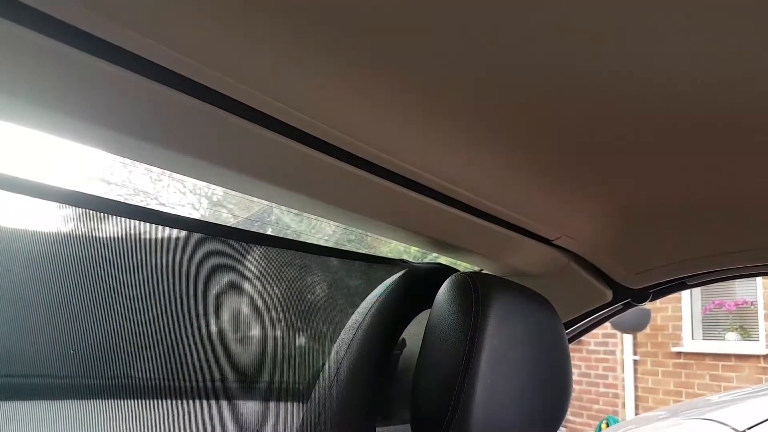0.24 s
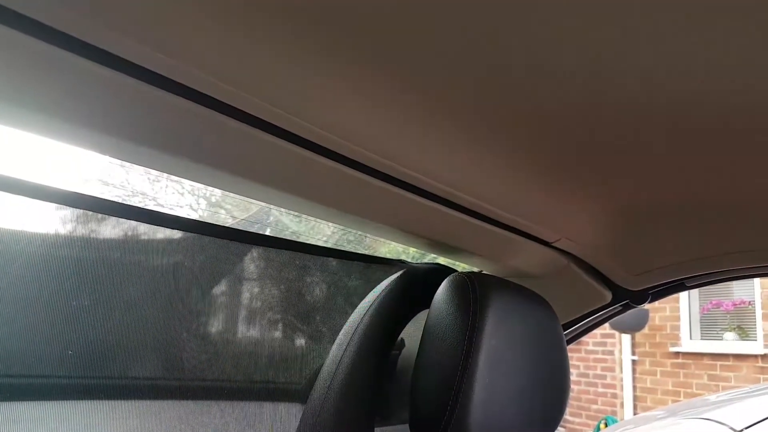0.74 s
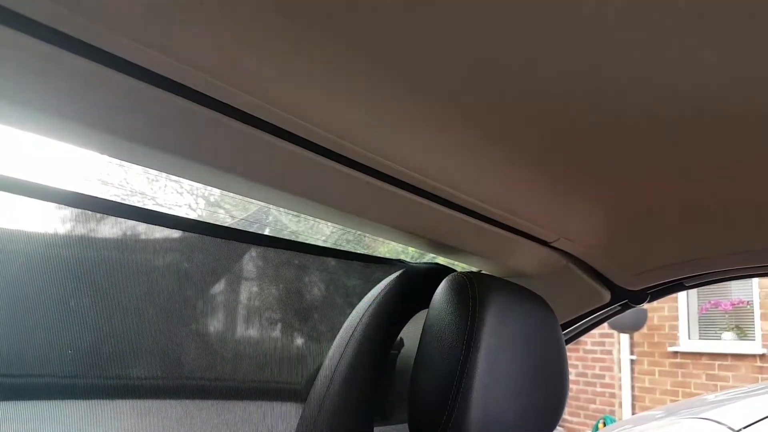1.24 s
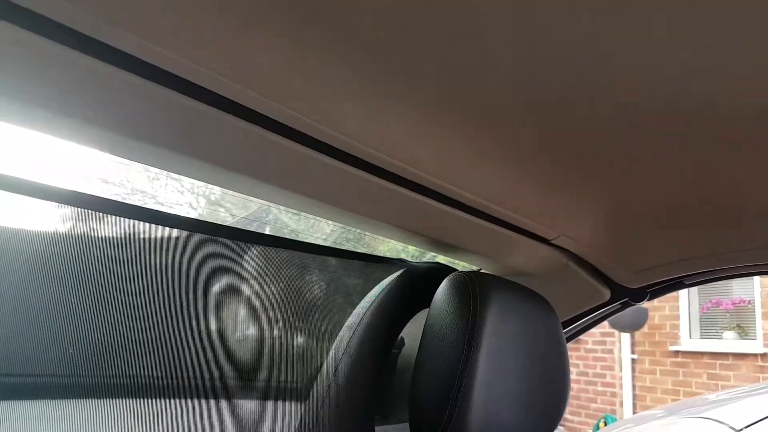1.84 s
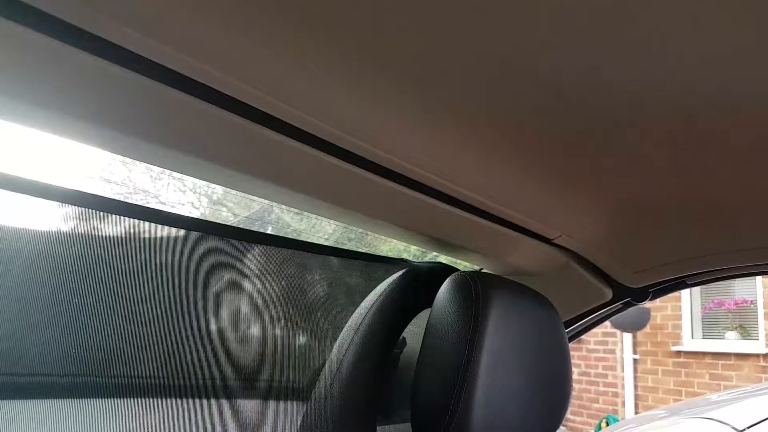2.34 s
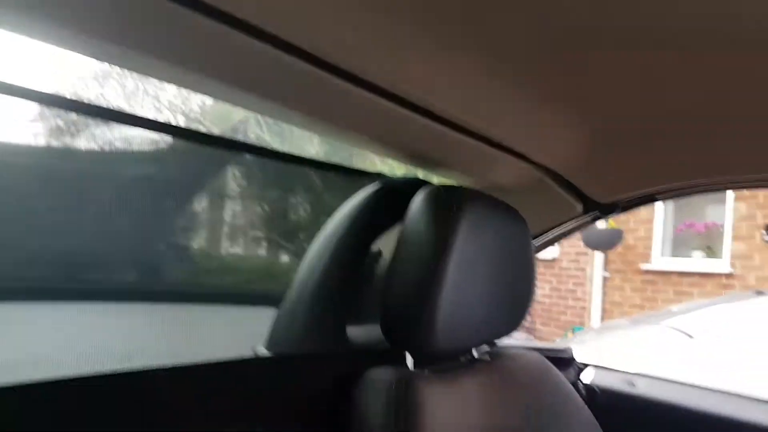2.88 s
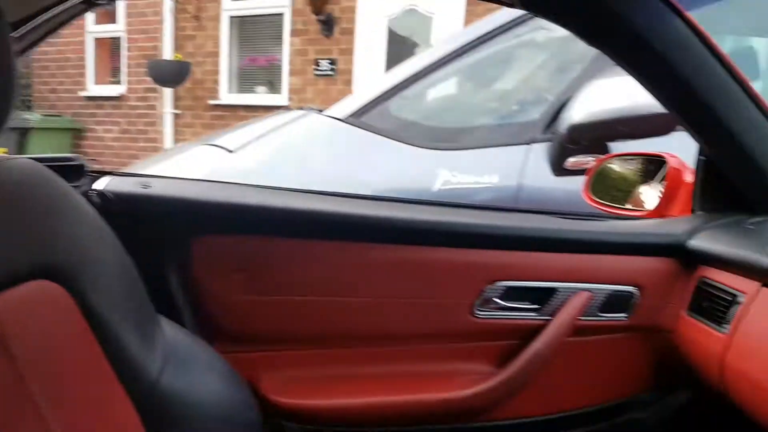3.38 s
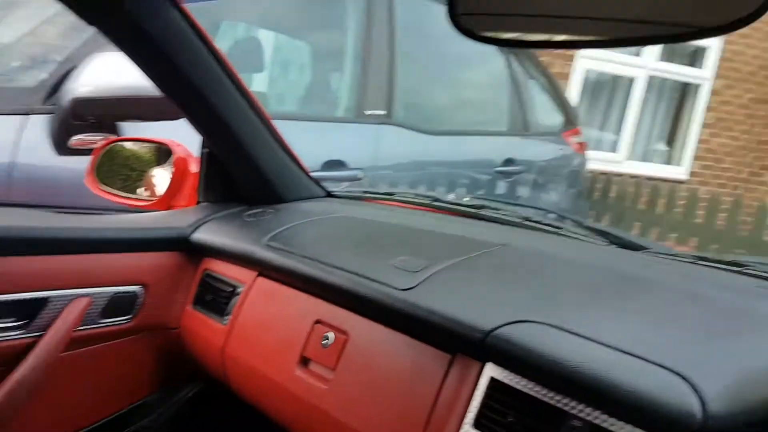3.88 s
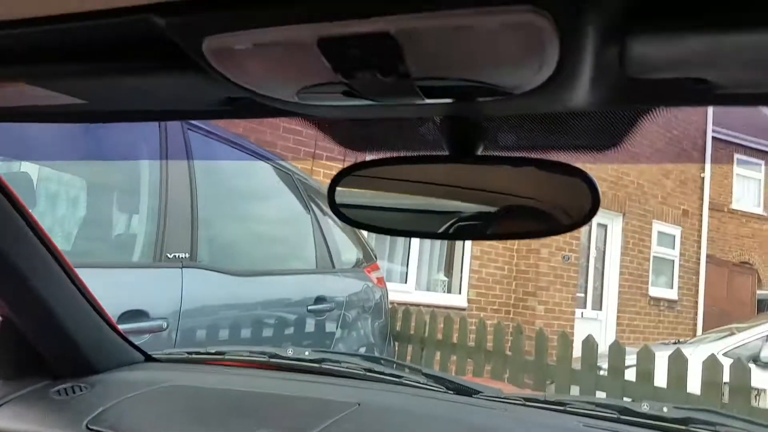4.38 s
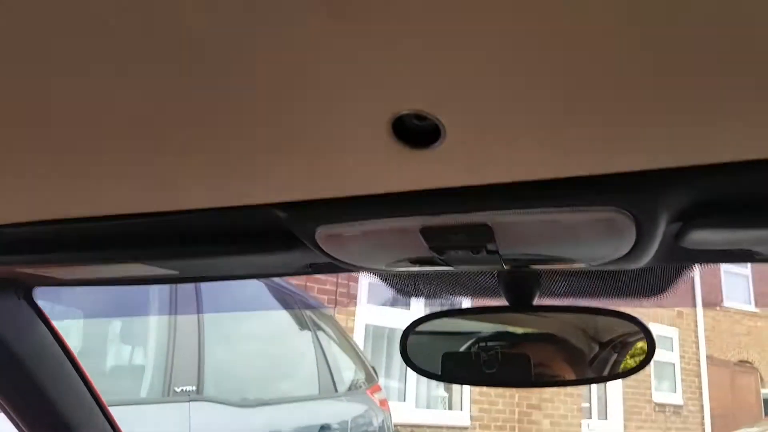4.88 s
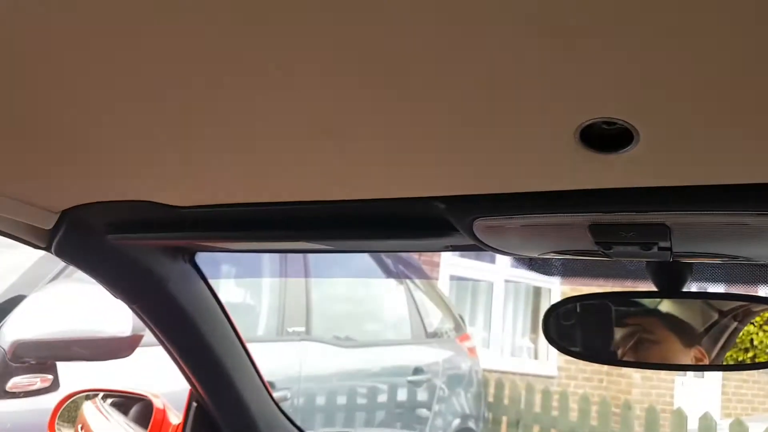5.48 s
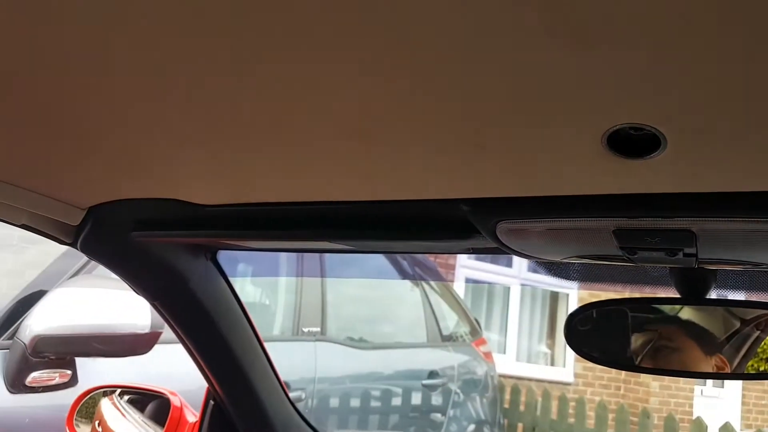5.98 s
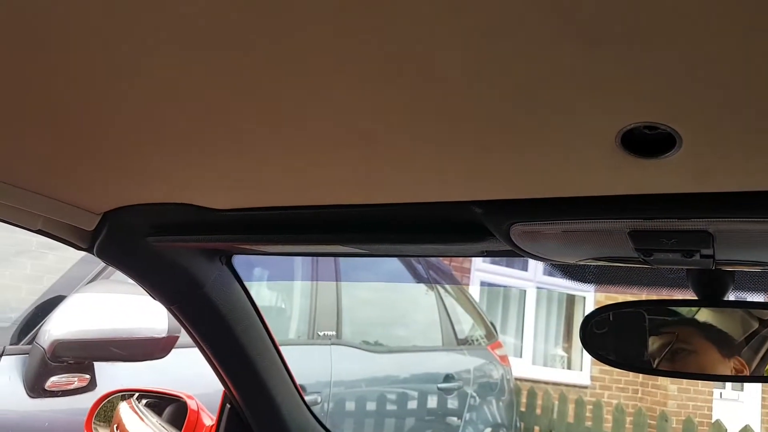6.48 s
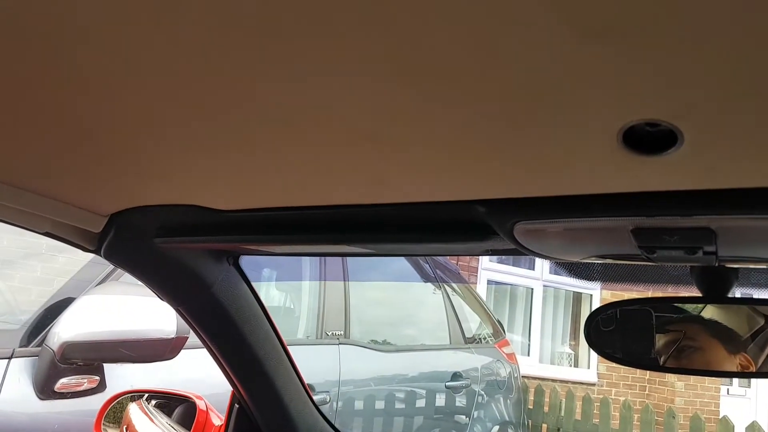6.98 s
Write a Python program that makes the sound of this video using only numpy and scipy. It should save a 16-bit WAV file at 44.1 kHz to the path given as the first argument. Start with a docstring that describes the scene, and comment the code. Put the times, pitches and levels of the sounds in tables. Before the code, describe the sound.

Close, enclosed car cabin with a handheld stereo microphone. Engine idle and low electric hum run throughout. Three short bursts of whining, scraping roof motor pull the hum down in pitch and level; each ends with a click, a boomy clunk with rattling rebound and a brief falling groan. Soft sleeve rustling comes in the middle, then a calmer stretch before the last burst.

```python
"""Inside an idling convertible whose folding roof is stuck; an electric pump hums steadily.
Engine and pump are wavering multiples of a rotation rate; the engine adds coloured noise.
Shortly after each press of the roof switch a drive motor whines and scrapes, and the hum sags under the load.
When the switch is let go the mechanism stops with a double knock, built of ringing modes and rattling noise,
and the hum recovers. Cloth rustles as the microphone swings round to the front of the cabin."""
import sys
import numpy as np
from scipy import signal
from scipy.fft import rfft, irfft, next_fast_len
from scipy.io import wavfile

SR = 44100
rng = np.random.default_rng(int(sys.argv[2]) if len(sys.argv) > 2 else 0)


def bounce(signal):
    """Save signal as a 16-bit WAV file at the path given by the first command-line argument."""
    frames = np.transpose(np.atleast_2d(signal))
    limited = np.clip(frames, -1, 1)
    pcm = np.round(limited * 32767).astype(np.int16)
    wavfile.write(sys.argv[1], SR, pcm)


N = 318843
TIME = np.arange(N) / SR

# likeness of the two microphone ports: (frequency [Hz], left-right correlation [-1 to 1])
PORT_LIKENESS = [(50, .985), (138, .95), (250, .84), (500, .5), (1000, -.2), (2000, 0), (4000, .1),
                 (12000, 0)]
# low engine noise: (frequency [Hz], relative density [dB per Hz])
RUMBLE_COLOUR = [(150, 1.5), (200, -3), (250, -3.5), (300, -4), (390, -5), (470, -10), (560, -7),
                 (660, -11)]
# engine drone through the bulkhead: (frequency [Hz], relative density [dB per Hz])
DRONE_COLOUR = [(560, -6.5), (680, -3.5), (880, -0.5), (1000, -3), (1170, -5), (1400, -7), (1900, -11),
                (2600, -15.5), (3500, -23.5)]
# runs of the drive motor, the first already under way: (start [s], stop [s], whine level [dB])
MOTOR_RUNS = [(-.29, 0.48, -59.5), (1.757, 2.72, -60), (6.469, 7.041, -61)]
# knocks in the body:
# (time [s], boom [dB], panel [dB], rattle [dB], motor mount [dB], end stop clack [dB])
BODY_KNOCKS = [(.115, -46, -53, -46, -28.5, -60), (0.4808, -20, -25, -26.5, -38, -19.5),
               (1.748, -31, -44.5, -49, -28.5, -42), (1.82, -25.5, -34.5, -34, -23.5, -35),
               (2.205, -37, -60, -50, -34, -60), (2.7211, -20.5, -22.5, -24.5, -32, -17),
               (6.467, -29, -42.5, -37.5, -28, -46), (6.493, -46, -50, -40, -39, -38),
               (6.545, -25.5, -34, -36, -22.5, -34), (7.0435, -20.5, -40, -27, -28, -35)]
# modes of the rubber roof seal: (frequency [Hz], level [dB], t60 [s])
SEAL_MODES = [(1900, -3, .007), (2280, 0, .0075), (2560, -8, .007)]

# the microphone swings past the dashboard: time and spread
SWING_AT_S, SWING_WIDTH_S = 3.87, 0.56
# after every stop the linkage falls back in a second knock, met once the slack is taken up
REBOUND_S, SLACK_S = 0.045, 0.001952


def from_db(db):
    """Decibels to gain."""
    return 10 ** (np.asarray(db) / 20)


def rms_one(x):
    """Scale to rms 1."""
    return x / np.sqrt(np.mean(x ** 2) + 1e-20)


def in_time(rows):
    """Each column of a curve, sample by sample."""
    s, *columns = np.transpose(rows)
    return [np.interp(TIME, s, c) for c in columns]


def at_hz(points, hz):
    """Read a table on a log-frequency axis."""
    table_hz, values = np.array(points)[:, 0], np.array(points)[:, 1]
    return np.interp(np.log(hz + 1e-3), np.log(table_hz), values)


def ramp(start, length):
    """Rises from 0 to 1 in a straight line."""
    return np.clip((TIME - start) / length, 0, 1)


def hump(centre, width):
    """A smooth swell of height 1."""
    return np.exp(-np.minimum(((TIME - centre) / width) ** 2, 50))


def drift(rate_hz):
    """Slow chance of spread 1: low-passed noise, drawn every 40 samples and joined by straight lines."""
    pole = np.exp(-80 * np.pi * rate_hz / SR)
    draws = rng.standard_normal(N // 40 + 2002)
    slow = signal.lfilter([1], [1, -2 * pole, pole * pole], draws)[2000:]  # settled part only
    return np.interp(np.arange(N) / 40, np.arange(len(slow)), rms_one(slow))


def ports(hz):
    """Gains of the two ports at this frequency."""
    # (frequency [Hz], left minus right [dB])
    balance = [(50, -1.3), (130, 0.5), (250, 0.5), (600, -3), (2000, -2), (4000, -3), (12000, -0.5)]
    return from_db(np.array([[.5], [-.5]]) * at_hz(balance, hz))


def port_phase(hz):
    """Phase at each port: short waves reach them out of step."""
    alike = np.clip(at_hz(PORT_LIKENESS, hz), -1, 1)
    return np.array([[.5], [-.5]]) * np.arccos(alike)


def noise(spectrum):
    """Stereo noise of a given colour, falling steeply past its ends; rms 1."""
    size = next_fast_len(N)
    hz = np.arange(size // 2 + 1) * SR / size + 0.00085
    mid, side = rfft(rng.standard_normal((2, size)))
    alike = np.clip(at_hz(PORT_LIKENESS, hz), -1, 1)
    pair = np.sqrt(1 + alike) * mid + np.sqrt(1 - alike) * side * [[1], [-1]]
    ends = np.minimum(1, np.minimum(hz / spectrum[0][0], spectrum[-1][0] / hz)) ** 4
    coloured = pair * ports(hz) * ends * from_db(at_hz(spectrum, hz))
    return rms_one(irfft(coloured, size)[:, :N])


def cycles(hz):
    """Running phase, in radians, of something that turns at this rate."""
    return 2 * np.pi * np.cumsum(hz) / SR


def partials(hz, orders, waver_db, waver_hz, resonances=()):
    """Multiples of a rotation rate, each wavering a little and swelling as it passes a resonance."""
    phase, out = cycles(hz), 0
    for k, db in orders:
        centre_hz = k * np.median(hz)
        level_db = db + waver_db * drift(waver_hz)
        for peak_hz, width_hz, boost_db in resonances:
            level_db = level_db + boost_db / (1 + (2 * (k * hz - peak_hz) / width_hz) ** 2)
        wave = np.sin(round(k) * phase + rng.uniform(0, 2 * np.pi) + port_phase(centre_hz))
        out = out + np.sqrt(2) * from_db(level_db) * ports(centre_hz) * wave
    return out


def burst(s, rise, t60):
    """Envelope of a blow: it swells for the rise time, then dies away."""
    out, start = np.zeros(N), round(s * SR)
    age = TIME[:min(N - start, SR // 2)]
    decay = from_db(-60 * np.maximum(age - rise, 0) / t60)
    out[start:start + len(age)] = np.minimum(age / rise, 1) * decay
    return out


def struck(times, levels_db, hz, t60, scatter_db):
    """One mode, set ringing by each blow with a slightly different strength."""
    out, age = np.zeros((2, N)), TIME[:SR // 2]
    onset = np.minimum(2 * age * hz, 1)  # half a period
    decay = from_db(-60 * age / t60)
    ring = np.sin(2 * np.pi * hz * age + port_phase(hz)) * decay * onset * ports(hz)
    strengths_db = levels_db + scatter_db * rng.standard_normal(len(times))
    for s, db in zip(times, strengths_db):
        start = round(s * SR)
        out[:, start:start + len(age)] += from_db(db) * ring[:, :N - start]
    return out


def chatter(slips, modes):
    """Sharp slips set a few short-lived modes ringing."""
    ring = 0
    for k, (hz, db, t60) in enumerate(modes):
        ring = ring + (-1) ** k * struck([0], db, hz, t60, scatter_db=0)
    return signal.oaconvolve(slips[None], ring[:, :SR // 20], axes=1)[:, :N]


def engine(firing_hz, throb=.1):
    """The idle booms in the cabin; its mechanical noise throbs with the firings."""
    # (multiple of the firing rate, level [dB rms])
    engine_orders = [(1, -43.5), (2, -30.5), (3, -52.5), (4, -51.5), (9, -61), (15, -59)]
    # noise colours: (frequency [Hz], relative density [dB per Hz])
    bass_colour = [(20, -35), (35, 5), (60, -4), (90, 7.5), (125, 3.5), (170, -11.5), (260, -14)]
    hiss_colour = [(2000, 6), (3300, -4.5), (3950, -2.5), (4600, -2.5), (7000, -7), (9300, -12.5),
                   (13000, -8), (15500, -10.5)]
    phase = cycles(firing_hz)
    pulse = 1 + throb * (np.cos(phase) + 0.21 * np.cos(2 * phase))
    boom = partials(firing_hz, engine_orders, waver_db=1.22, waver_hz=35)
    bass = from_db(-45.5) * noise(bass_colour)
    clatter = pulse * (from_db(-47) * noise(RUMBLE_COLOUR) + from_db(-51) * noise(DRONE_COLOUR))
    # the hiss rises and flickers as the microphone swings
    hiss_db = -65 + (4 + 1.5 * drift(40)) * hump(SWING_AT_S, SWING_WIDTH_S)
    return boom + bass + clatter + from_db(hiss_db) * noise(hiss_colour)


def cabin_front(firing_hz, turn_at_s=3.87, turn_s=1.26):
    """Engine noise rings in the front of the cabin and throbs, heard as the microphone turns to it."""
    # (resonance [Hz], width of each of two filter passes [Hz], level [dB rms], depth of throb [0-1])
    front_modes = [(228, 25, -54, 0), (553, 70, -52, 0.46), (888, 90, -67, .7), (1126, 90, -60, .4),
                   (1333, 43, -68.5, 0), (1890, 90, -66.5, 0), (2600, 140, -73, 0.15), (4000, 340, -74, 0)]
    engine_noise = noise(DRONE_COLOUR) + noise(RUMBLE_COLOUR)
    beat, out = np.cos(cycles(firing_hz)), 0
    for hz, width_hz, db, throb in front_modes:
        peak = signal.iirpeak(hz, hz / width_hz, fs=SR)
        ring = signal.lfilter(*peak, signal.lfilter(*peak, engine_noise))
        out = out + from_db(db) * rms_one((1 + throb * beat) * ring)
    return ramp(turn_at_s, turn_s) * out


def sleeve(uneven_db=2):
    """Cloth brushes unevenly as the arm swings the microphone round: swells of coloured noise."""
    # (time [s], spread [s], level [dB])
    rustles = [(3.38, 0.071, -52.5), (3.52, 0.12, -56), (3.88, 0.35, -53.5), (4.131, 0.089, -58)]
    # (frequency [Hz], relative density [dB per Hz])
    brush_colour = [(620, 7.5), (850, 4), (1300, 3), (1700, -18), (3000, -34)]
    strokes = sum(from_db(db) * hump(s, width) for s, width, db in rustles)
    return strokes * from_db(uneven_db * drift(25)) * noise(brush_colour)


def pump():
    """The pump runs slower and weaker while the drive motor draws current, and swells as it is freed."""
    # (multiple of the stroke rate, relative level [dB])
    pump_orders = [(1, 0), (2, -23.5), (3, -25), (4, -24.5), (5, -27)]
    free_hz, loaded_hz, free_db, loaded_db = 137.46, 114.5, -36.5, -44
    # recovery begins after a wait from the motor's stop
    sag_s, wait_s, recover_s = 0.1741, 0.075, 0.0909
    release_db, release_width_s = 9.5, 0.054
    load, release = 0, 0
    for start, stop, _ in MOTOR_RUNS:
        load = load + ramp(start, sag_s) - ramp(stop + wait_s, recover_s)
        release = release + hump(stop + wait_s, release_width_s)
    stroke_hz = free_hz + (loaded_hz - free_hz) * load
    level_db = free_db + (loaded_db - free_db) * load ** 2 + release_db * release
    level_db = level_db - 5 * hump(SWING_AT_S, SWING_WIDTH_S)  # dips as the microphone swings
    unsteady_hz = stroke_hz * (1 + 0.0024 * drift(6.5))
    return from_db(level_db) * partials(unsteady_hz, pump_orders, waver_db=0.76, waver_hz=20)


def switch(crack_t60=0.041, cabin_t60=0.11, cabin_db=-7, bright_hz=6000):
    """The rocker cracks over, with two plastic rings, a spring ping, a cabin tail and a console thud."""
    # (time [s], snap [dB], console thud [dB], gain of the top [dB], main ring [Hz], second ring [Hz])
    switch_clicks = [(0.392, -35, -41.5, 1.5, 3500, 4480), (1.011, -58, -64, -5, 2600, 3480),
                     (1.0755, -36.5, -30.5, -9, 2510, 3480), (2.5444, -55, -64, 6, 3625, 4480),
                     (2.5684, -34, -37.5, 3.5, 3650, 4480), (5.6712, -48, -64, -14, 2750, 3300),
                     (5.7812, -36, -29, -4, 2640, 3250), (6.9122, -32.5, -34, -4, 2880, 4150),
                     (7.115, -50.5, -32.5, 7, 3460, 4480)]
    # (frequency [Hz], level [dB], t60 [s])
    console_modes = [(299, 6, 0.076), (341, -8, 0.12), (493, -1.5, 0.045), (790, -3, 0.047),
                     (1170, -6, 0.05)]
    # (frequency [Hz], relative density [dB per Hz])
    snap_colour = [(700, -29.5), (2000, -7), (2700, 0.5), (3500, -2.5), (4300, -4.5), (5500, -8),
                   (6500, -10), (9500, -14.5), (13000, -11.5), (15500, -36.5)]
    # rings and spring: levels against the snap
    main_ring_db, second_ring_db, ring_t60 = -2.5, -7, .04
    spring_hz, spring_db, spring_t60 = 6780, -12, .035
    times, snap_db, thud_db, *_ = np.transpose(switch_clicks)
    snap = noise(snap_colour)
    top = signal.sosfilt(signal.butter(1, bright_hz, "high", fs=SR, output="sos"), snap)
    out = struck(times, snap_db + spring_db, spring_hz, spring_t60, scatter_db=1)
    for hz, db, t60 in console_modes:
        out = out + struck(times, thud_db + db, hz, t60, scatter_db=.7)
    for s, db, _, bright_db, main_hz, second_hz in switch_clicks:
        shape = burst(s, 0.00087, crack_t60) + from_db(cabin_db) * burst(s, 0.0013, cabin_t60)
        out = out + from_db(db) * shape * (snap + (from_db(bright_db) - 1) * top)
        for hz, ring_db in (main_hz, main_ring_db), (second_hz, second_ring_db):
            out = out + struck([s], db + ring_db, hz, ring_t60, scatter_db=4)
    return out


def knocks(boom_top_hz=280):
    """A jolt rings the body panels and shakes loose linkage; each stop of the motor has a rebound."""
    # modes of the body panels and the motor mount: (frequency [Hz], level [dB], t60 [s])
    body_modes = [(67, -1.5, 0.12), (109.3, -2, 0.27), (151.5, 1, 0.19), (180, -11.5, 0.49),
                  (227.7, 3.5, 0.11), (340.3, -8.5, 0.29), (430.7, 3, 0.089), (509.4, 3, 0.066),
                  (591, -2, 0.098), (732, 1, 0.083), (811, 2.5, 0.088), (903, 1, 0.072), (998, -20, 0.16),
                  (1310, -5, 0.04), (1740, -8, 0.033), (1930, -5, 0.032)]
    mount_modes = [(313, -4.5, 0.11), (363, 1.5, 0.052)]
    # linkage rattle: (frequency [Hz], relative density [dB per Hz])
    rattle_colour = [(150, 11), (450, 12), (850, 8), (1100, 4.5), (1500, 0), (2000, -4.5), (2500, -6.5),
                     (4000, -18.5), (7000, -24.5), (10000, -39), (15500, -35)]
    rattle_rise_s, rattle_t60 = 0.0007, .135
    # rows: time, boom, panel, rattle, rise of the rattle
    blows = [(*knock, rattle_rise_s) for *knock, _, _ in BODY_KNOCKS]
    # the rebound's rattle swells more slowly
    blows += [(stop + REBOUND_S, -30, -38.5, -26.5, 0.008) for _, stop, _ in MOTOR_RUNS]
    times, boom_db, panel_db, rattle_db, rises = np.transpose(blows)
    jolts, *_, mount_db, _ = np.transpose(BODY_KNOCKS)
    body = sum(struck(jolts, mount_db + db, hz, t60, scatter_db=4.5) for hz, db, t60 in mount_modes)
    for k, (hz, db, t60) in enumerate(body_modes):
        blow_db = boom_db if hz < boom_top_hz else panel_db
        body = body + (-1) ** k * struck(times, db + blow_db, hz, t60, scatter_db=.7)
    shake = 0
    for s, db, rise in zip(times, rattle_db, rises):
        shake = shake + from_db(db) * burst(s, rise, rattle_t60)
    flutter = rms_one(from_db(2 * drift(310)))
    return body + shake * flutter * noise(rattle_colour)


def end_stop():
    """Each jolt has a short, hard clack of ringing modes as the end stop is met."""
    # (frequency [Hz], level [dB], t60 [s])
    stop_modes = [(540, -3, .02), (770, 0, .024), (1260, -9, .018), (1770, -13, .03), (1940, -10, .018)]
    times, *_, clack_db = np.transpose(BODY_KNOCKS)
    met = times + SLACK_S
    return sum(struck(met, clack_db + db, hz, t60, scatter_db=.7) for hz, db, t60 in stop_modes)


def rebound_chatter(count=4, gap_s=.0052, peak_db=-32):
    """On each rebound a loose link strikes a few times in quick succession, hardest in the middle."""
    # (frequency [Hz], level [dB], t60 [s])
    link_modes = [(850, 0, .035), (1150, -7, .03), (1640, -2, .04), (1970, -7, .03), (2400, -13, .025)]
    contacts = np.zeros(N)
    strength = from_db(peak_db) * np.sin(np.pi * (np.arange(count) + .5) / count)
    for _, stop, _ in MOTOR_RUNS:
        uneven = np.arange(count) + rng.uniform(-0.265, .25, count)
        times = stop + REBOUND_S + SLACK_S + gap_s * uneven
        contacts[np.round(times * SR).astype(int)] = strength
    return chatter(contacts, link_modes)


def braking(first_hz=240, fall_s=.09, level_db=-23.5, rise_s=0.033, t60=0.53):
    """At each stop the motor brakes with a groan whose pitch falls to 1/e of its start in fall_s."""
    out = 0
    for _, stop, _ in MOTOR_RUNS:
        hz = first_hz * np.exp(-np.maximum(TIME - stop, 0) / fall_s)
        out = out + burst(stop, rise_s, t60) * np.sin(cycles(hz) + rng.uniform(0, 2 * np.pi))
    return from_db(level_db) * out


def joint_ticks(rise_s=.001, t60=.022):
    """Roof joints strained by the motor give way in tiny bright ticks of noise."""
    # (time [s], level [dB])
    tick_times = [(.025, -59), (.076, -58), (.116, -61), (.152, -64), (.196, -66), (.270, -59),
                  (2.051, -55), (2.088, -55), (2.096, -56), (2.172, -57), (2.216, -63), (2.255, -56),
                  (2.295, -56), (2.414, -57), (2.494, -59), (2.655, -57)]
    # (frequency [Hz], relative density [dB per Hz])
    tick_colour = [(3000, -16), (6200, -14), (7200, 0), (8300, 0), (9500, -14)]
    shape = sum(from_db(db) * burst(s, rise_s, t60) for s, db in tick_times)
    return shape * noise(tick_colour)


def rasps(per_s=175, jitter=.25, uneven_db=1.6, edge_s=0.0071):
    """The roof creaks as it is dragged: quick trains of slips ring its seal and guide."""
    # (time [s], length [s], seal level [dB], guide level [dB])
    rasp_times = [(.015, .075, -47, -48), (1.835, .033, -46, -42), (1.925, .06, -41, -37.5),
                  (2.0, .06, -44, -40), (2.085, .07, -48, -47), (6.555, .032, -35, -47),
                  (6.633, .074, -30.5, -45), (6.733, .046, -30.5, -44), (6.808, .016, -31, -52)]
    # dry metal guide: (frequency [Hz], level [dB], t60 [s])
    guide_modes = [(1250, -2, .008), (1650, 0, .008), (2100, -1, .007), (3400, -8, .004), (7400, -7, .002)]
    turns = cycles(per_s * np.exp(jitter * drift(120))) // (2 * np.pi)
    slips = np.diff(turns, prepend=0) * from_db(uneven_db * rng.standard_normal(N))
    seal, guide = 0, 0
    for s, length, seal_db, guide_db in rasp_times:
        train = slips * (ramp(s, edge_s) - ramp(s + length, edge_s))
        seal = seal + from_db(seal_db) * train
        guide = guide + from_db(guide_db) * train
    return chatter(seal, SEAL_MODES) + chatter(guide, guide_modes)


def stick_slip(per_s, jitter, depth_db, uneven_db):
    """Uneven slips: each starts at once with a strength of its own and fades until the next; rms 1."""
    slips = cycles(per_s * np.exp(jitter * drift(60))) / (2 * np.pi)
    size_db = uneven_db * rng.uniform(-0.92, 1, N)[slips.astype(int)]
    return rms_one(from_db(size_db - depth_db * (slips % 1)))


def small_catches(firing_hz, on, chance=.35, scrape_db=-57, seal_db=-43):
    """Some engine firings jog the moving parts: rows (s, scrape dB, seal dB)."""
    firings = np.flatnonzero(np.diff(cycles(firing_hz) // (2 * np.pi)))
    draws = rng.random(len(firings))
    return [(i / SR, scrape_db, seal_db) for i, luck in zip(firings, draws) if luck < chance * on[i]]


def motor_runs(fade_in_s=0.046, coast_s=0.011, slide_at_s=0.23, slide_width_s=0.09):
    """What all runs share: drive on (0-1), time since the start, whine level and sliding (0-1)."""
    on, age, whine_db, slide = np.zeros((4, N))
    for start, stop, db in MOTOR_RUNS:
        on = on + ramp(start, fade_in_s) - ramp(stop, coast_s)
        age = np.where(TIME >= start, TIME - start, age)
        whine_db = np.where(TIME >= start, db, whine_db)
        slide = slide + hump(start + slide_at_s, slide_width_s)  # most just before the stiff spot
    return on, age, whine_db, slide


def geared_motor(firing_hz, shake=0.097, catch_t60=0.03):
    """The armature whines and whistles over a whir of gears; sliding parts stick and slip in the idle."""
    # (multiple of the motor speed, level [dB])
    motor_orders = [(1, 0.5), (2, 4.5), (3, 4.5), (4, 6), (5, -5), (7, -0.5), (8, -5.5), (10, -3), (12, -6),
                    (13, -8.5), (14, -10.5), (17, -11), (18, -11), (19, -13), (22, -15)]
    # housing resonances: (frequency [Hz], width [Hz], boost [dB])
    housing = [(2405, 90, 12), (3975, 70, 7)]
    # overshoot, a labour through a stiff spot, recovery: (time after the start [s], speed [Hz])
    speed_curve = [(0, 172), (.15, 187.5), (.235, 182.5), (.315, 174.3), (.375, 171.3), (.44, 173.3),
                   (.51, 178.3), (.62, 180.5), (.96, 181.3)]
    # armature slot whistle through the three runs: (time [s], level [dB rms])
    whistle_curve = [(0, -57.5), (.12, -58.5), (.2, -63), (.3, -59), (.44, -54), (.48, -60), (1.8, -64),
                     (2.0, -61), (2.1, -57.5), (2.27, -60), (2.4, -60.5), (2.6, -54.5), (2.7, -54.5),
                     (2.73, -66), (6.48, -58), (6.62, -65), (6.78, -55), (7.01, -53.5), (7.035, -68)]
    # loudest catches in the sliding parts: (time [s], scrape level [dB], seal level [dB])
    loud_catches = [(.034, -53, -44), (.078, -58, -37), (.196, -58, -40), (0.271, -54, -41),
                    (.312, -54, -34), (1.884, -49, -50), (2.036, -47, -36), (2.084, -45, -38),
                    (2.174, -48, -43), (2.216, -52, -33), (2.338, -56, -36), (6.608, -61, -31),
                    (6.616, -64, -34), (6.732, -56, -34), (6.833, -50, -37), (6.856, -49, -30),
                    (6.865, -57, -31), (6.988, -52, -36), (7.032, -57, -36)]
    # gear and scrape colours: (frequency [Hz], relative density [dB per Hz])
    whir_colour = [(90, -13), (115, 16), (160, 15.5), (400, 8.5), (760, 3.5), (1000, 0), (1280, -1),
                   (1600, -19), (2300, -7.5), (2900, -9.5), (3400, -20), (4000, -18), (9500, -32.5),
                   (12500, -26), (15500, -48)]
    scrape_colour = [(300, 1), (1200, 11.5), (1600, -3), (2500, 2), (4500, -6), (8000, -10), (9500, -16.5),
                     (13000, -12), (15500, -32)]
    whine_rise_s, slot_order = 0.2, 16
    # the whir settles after a surge at the start; the scrape swells while sliding
    whir_db, surge_db, surge_s = -47.5, 14, 0.2
    scrape_db, slide_db = -56, 9

    on, age, whine_db, slide = motor_runs()
    speed_hz = np.interp(age, *np.transpose(speed_curve))
    unsteady_hz = speed_hz * (1 + .001 * drift(10))
    whine_gain = on * np.minimum(age / whine_rise_s, 1) * from_db(whine_db)
    whine = whine_gain * partials(unsteady_hz, motor_orders, 1.2, waver_hz=14, resonances=housing)
    slots = partials(speed_hz, [(slot_order, 0)], waver_db=1.3, waver_hz=25)
    whistle = on * from_db(in_time(whistle_curve)[0]) * slots
    surge = np.exp(-age / surge_s)
    whir_level_db = whir_db + surge_db * surge + (1.0 + 1.8 * surge) * drift(37)
    whir = on * from_db(whir_level_db) * noise(whir_colour)

    shaken = 1 + shake * np.cos(cycles(firing_hz))
    slips = stick_slip(per_s=200, jitter=0.34, depth_db=5, uneven_db=-4.0)
    scrape = on * from_db(scrape_db + slide_db * slide) * shaken * slips
    snags = np.zeros(N)
    for s, catch_db, seal_db in loud_catches + small_catches(firing_hz, on):
        scrape = scrape + from_db(catch_db) * burst(s, 0.00067, catch_t60)
        snags[round(s * SR)] += from_db(seal_db)
    return whine + whistle + whir + scrape * noise(scrape_colour) + chatter(snags, SEAL_MODES)


def scene():
    """Engine, pump, motor, rasps, knocks, switch and sleeve as heard from the front seat."""
    # engine idle: (time [s], twice the firing rate [Hz])
    idle_curve = [(0.0, 53.1), (0.1, 51.42), (1.17, 52.4), (1.34, 50.35), (6.47, 50.36), (7.0, 50.25)]
    firing_hz = in_time(idle_curve)[0] / 2
    idle = engine(firing_hz) + cabin_front(firing_hz)
    jolts = knocks() + end_stop() + rebound_chatter() + braking()
    drive = pump() + joint_ticks() + rasps() + geared_motor(firing_hz)
    return idle + sleeve() + switch() + jolts + drive


def record(dry):
    """The top is cut steeply by a low-pass at 15.6 kHz."""
    return signal.sosfilt(signal.ellip(12, .1, 80, 15600, fs=SR, output="sos"), dry)


dry = scene()
out = record(dry)
bounce(out)
```